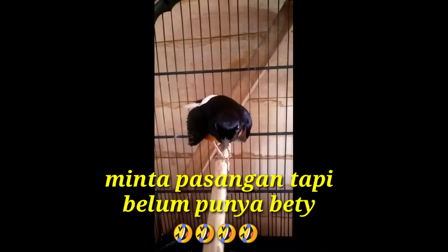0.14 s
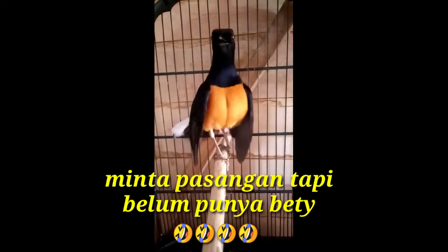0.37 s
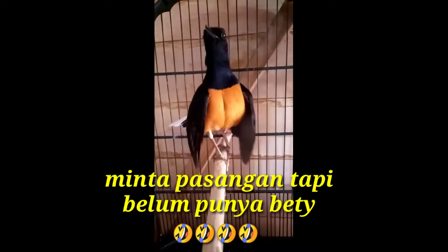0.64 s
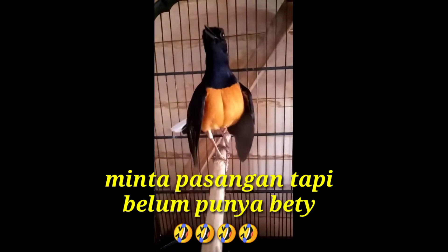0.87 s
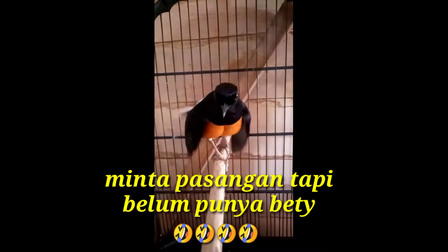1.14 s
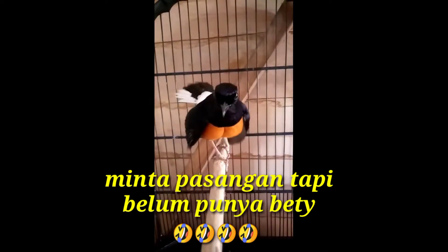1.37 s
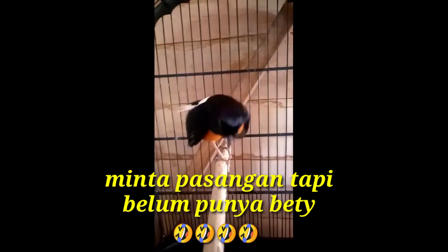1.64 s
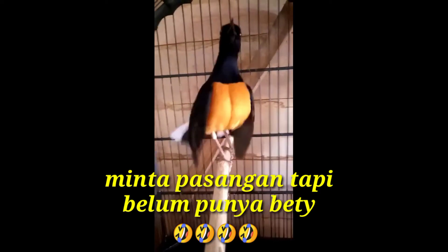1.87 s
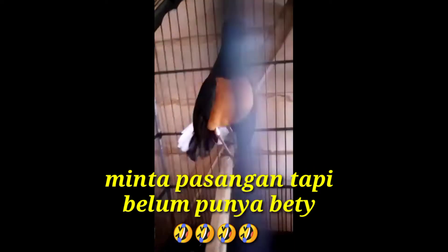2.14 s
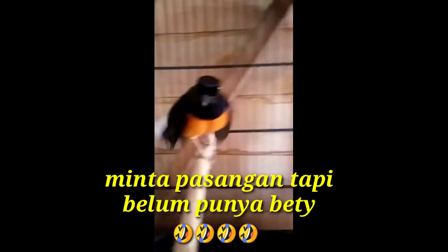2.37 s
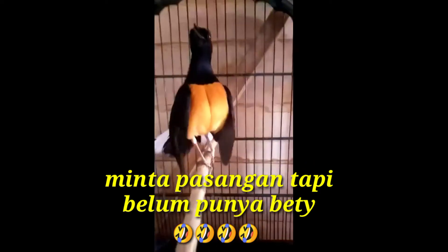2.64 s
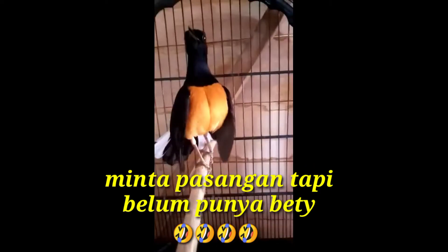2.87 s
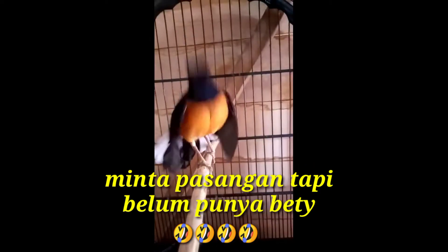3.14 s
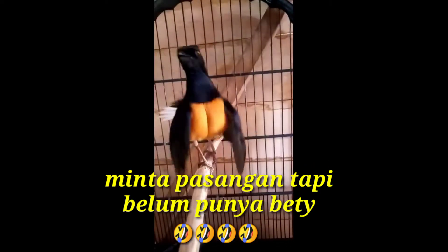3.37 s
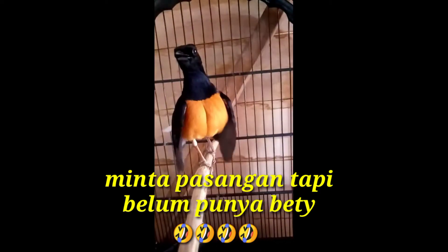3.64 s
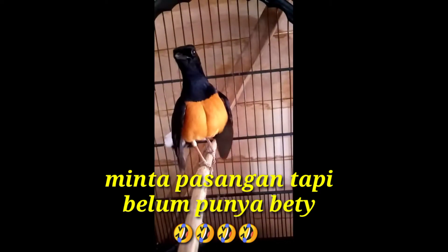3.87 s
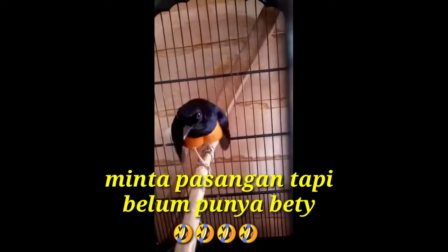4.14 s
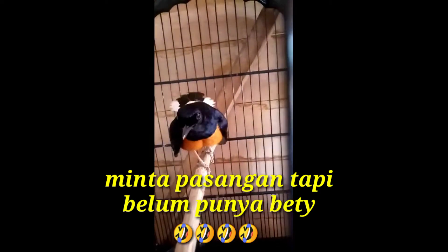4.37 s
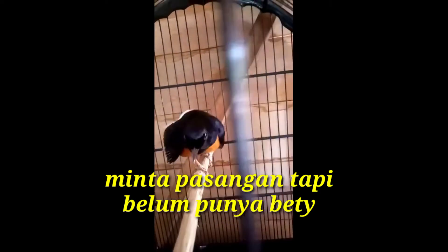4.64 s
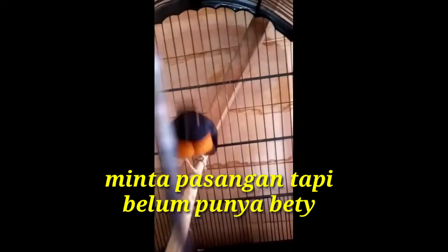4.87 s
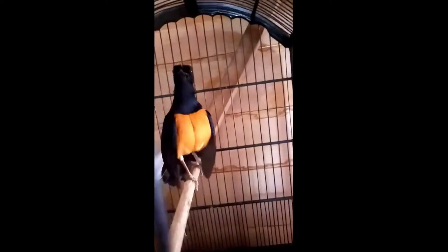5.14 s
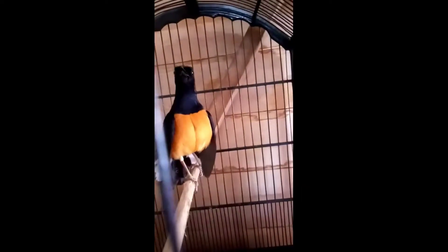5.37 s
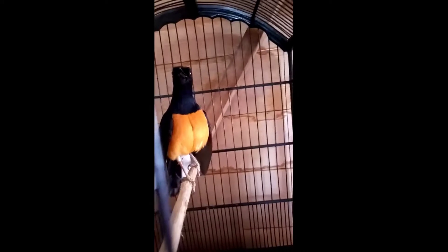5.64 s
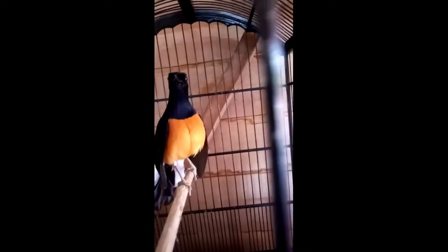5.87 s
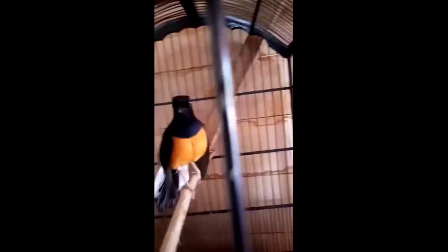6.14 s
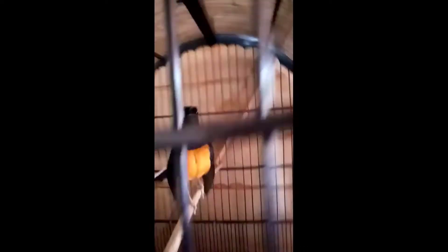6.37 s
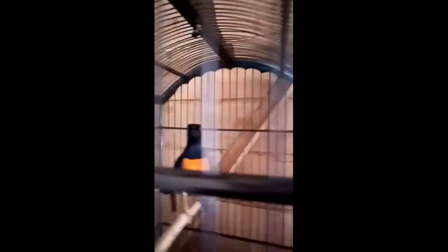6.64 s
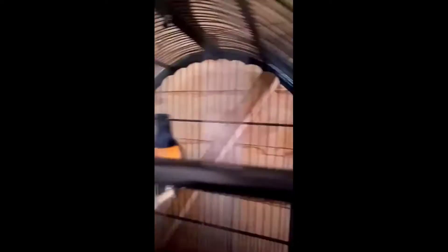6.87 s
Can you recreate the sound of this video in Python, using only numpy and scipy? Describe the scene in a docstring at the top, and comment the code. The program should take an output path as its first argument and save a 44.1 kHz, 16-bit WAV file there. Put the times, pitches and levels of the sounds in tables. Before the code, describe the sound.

One songbird sings loudly and close in a small, hard-walled room. Rapid sliding whistles and buzzy notes come first, then a run of sharp chips with a short nasal squawk among them. A quieter gap holds only faint low chucks, then dense, high, twisting whistles return. Feathers rustle softly, the cage clicks, and low hum and hiss grow towards the end. A phone microphone ducks the background under loud notes.

```python
"""In a small hard room a caged songbird sings close to a phone.
Its gliding whistles, buzzy trills and short chips are sine waves with overtones; one squawk is a nasal stack.
Clicks and puffs of shaped noise come from the cage, and the walls answer with short noise echoes.
Wavering hums and patchy noise make a low hum and a wide hiss that grow stronger towards the end.
The phone's gain control ducks everything whenever the bird is loud."""
import sys
import numpy as np
from scipy import signal
from scipy.fft import rfft, irfft, next_fast_len
from scipy.io import wavfile
from scipy.ndimage import uniform_filter1d, minimum_filter1d, map_coordinates

SR = 44100
rng = np.random.default_rng(int(sys.argv[2]) if len(sys.argv) > 2 else 0)


def wav_record(signal):
    """Record a signal, one row per channel, as 16-bit PCM in the file named by sys.argv[1]."""
    frames = np.transpose(np.atleast_2d(signal))
    bounded = np.clip(frames, -1, 1)
    # unit amplitude maps onto the largest positive 16-bit level
    quanta = np.round(bounded * 32767).astype(np.int16)
    wavfile.write(sys.argv[1], SR, quanta)


def attenuation_scalar(level_db):
    """Turn a level in dB into a linear amplitude multiplier (20 dB per decade)."""
    decades = np.asarray(level_db, float) / 20
    return 10 ** decades


N = 309141
T = np.arange(N) / SR

# Notes sung once: second harmonic over the first at opening [level/dB] and at closing [level/dB],
# then a curve of [t/s, f/Hz, level/dB before the swell bends it]
SINGLE_NOTES = [ (-31, -22, [(0.02, 1250, -30.5), (0.045, 1497, -13.5), (0.068, 1490, -12.5),
                (0.1, 1327, -22), (0.157, 797, -29)]), (-38.5, -27, [(0.21, 1460, -59),
                (0.226, 1508, -11.5), (0.245, 1628, -2.5), (0.256, 1730, -22), (0.264, 1790, -2),
                (0.295, 2176, 5.5), (0.35, 2430, -5), (0.41, 2560, -13.5), (0.435, 2825, -17.5)]),
                (-66, -33.5, [(0.778, 1914, -33), (0.804, 2320, 1.5), (0.84, 1730, -8.5)]),
                (-28, -34.5, [(0.835, 1410, -18), (0.862, 1308, -8), (0.885, 1591, -6), (0.95, 1778, -6),
                (1.0, 2158, -9.5), (1.035, 2446, -24.5)]), (-18.5, -15, [(1.022, 3120, -62),
                (1.061, 3587, 3.5), (1.085, 3464, 5), (1.1, 3210, -43)]), (-23, -22, [(1.197, 1613, -24),
                (1.218, 1228, -16), (1.238, 925, -39)]), (-22, -34, [(1.63, 860, -32), (1.655, 1367, -9),
                (1.68, 2070, 0), (1.725, 2750, -26)]), (-31.5, -9.5, [(1.74, 896, -66), (1.777, 2032, -3),
                (1.799, 2550, -24), (1.837, 2787, -4), (1.858, 3840, -5.5)]),
                (14, -7, [(1.962, 2900, -28.5), (1.972, 2413, -30), (1.99, 2494, -29), (2.03, 2665, -12.5),
                (2.082, 2812, -1), (2.092, 3556, 3), (2.108, 3510, -24)]), (3.5, -8, [(2.176, 3920, -19),
                (2.183, 2646, -11.5), (2.22, 2610, -12.5), (2.29, 2825, -6.5), (2.338, 2936, -5.5),
                (2.355, 3610, -0.5), (2.365, 4290, -1.5), (2.372, 4000, -20)]),
                (-28, -14, [(2.97, 2770, -31), (2.977, 2700, -9.5), (2.988, 2653, -12),
                (3.004, 3010, -3.5)]), (-4.5, 29.5, [(4.99, 2060, -51), (5.004, 1915, -19),
                (5.019, 1781, -11.5), (5.059, 1727, -30.5), (5.088, 1682, -44)]),
                (-12, -32, [(5.076, 1490, -29), (5.097, 2190, -15), (5.113, 2220, -10.5),
                (5.122, 1670, -16)]), (-16, -41, [(5.12, 2590, -17), (5.13, 3043, -12), (5.14, 2484, -7.5),
                (5.15, 2438, 4), (5.163, 2220, -21), (5.169, 2083, 10.5), (5.188, 1902, 4),
                (5.198, 1601, 5), (5.234, 1396, 0.5), (5.25, 1294, -34)]), (-21, -26, [(5.255, 1415, -27),
                (5.275, 1474, -7), (5.285, 1450, -39)]), (-31, -14, [(5.28, 2250, -27), (5.297, 2857, 0),
                (5.313, 3190, -23), (5.345, 3390, -9.5)]), (-46, 15, [(5.345, 3260, -26),
                (5.352, 3965, -24.5), (5.367, 3000, -15), (5.391, 4500, -31.5), (5.41, 3800, -13.5)]),
                (-42.5, -26.5, [(5.407, 2950, -2), (5.418, 3000, -5), (5.44, 3150, -28)]),
                (12, -27, [(5.748, 1790, -23), (5.763, 1340, -11.5), (5.79, 1755, -8.5)]),
                (-22, -36, [(5.783, 2460, -30), (5.799, 2066, 6), (5.837, 1427, 1.5), (5.85, 1435, 1)]),
                (6, 23.5, [(6.094, 1546, -14), (6.106, 1003, -28), (6.115, 769, -27), (6.128, 630, -34.5)]),
                (-17, 13.5, [(6.292, 2500, -32), (6.306, 1960, -19.5), (6.355, 1788, -16.5),
                (6.41, 1768, -34), (6.45, 1746, -42)]), (-24, -30, [(6.455, 3230, -23.5),
                (6.476, 2460, -4.5), (6.498, 2350, 1), (6.525, 2085, -17), (6.528, 1916, 9),
                (6.54, 1654, 3.5), (6.565, 1520, -1)]), (-22, -14.5, [(6.592, 1563, 3), (6.604, 1920, -12),
                (6.612, 2883, -4), (6.62, 3140, -11.5), (6.635, 3400, -8)]), ]
# Syllables that return: second harmonic at opening over closing [level/dB],
# then a curve of [share of the length, pitch over the named pitch, level/dB over the named level]
SYLLABLE_SHAPES = dict( fall=(-10, [(0, .88, -16), (.14, 0.89, -8), (.34, 0.98, 3), (.54, .76, -14),
                   (1, 0.59, -25)]), scoop=(22, [(0, .42, -33.5), (.2, .5, -29), (.36, 0.76, -4.5),
                   (.46, 0.79, -19), (.53, .95, 3), (.82, 1, 1), (1, 0.855, -24)]),
                   chuck=(-15.5, [(0, 2.1, -7), (.28, 1.32, 0.5), (.62, 1, 0), (1, 0.892, -6)]),
                   dip=(-13, [(0, 1.18, -47), (.37, 1, 2.5), (.62, 1.03, 2.5), (1, 1.4, -33)]),
                   swing=(-2.2, [(0, 1.23, -16.5), (.18, 1.07, -3), (.42, 1, -15.5), (.82, 1.17, -0.5),
                   (1, 1.21, -22)]), leap=(-11, [(0, 0.33, -31), (.17, 0.73, -17.5), (.27, .88, 3.5),
                   (.36, 0.93, -15.5), (.6, 1, -1), (1, .92, -35.5)]), peep=(8.2, [(0, 1.03, -12.5),
                   (.64, 1, 5), (1, 1.02, -29.5)]), rising_peep=(41.3, [(0, .92, -20), (.25, 0.96, 1),
                   (1, 1, 1.5)]))
# Where each syllable is sung: [t/s, length/s, named f/Hz, named level/dB,
# closing second harmonic over the first level/dB]
SYLLABLE_TIMES = dict( fall=[(.488, 0.118, 1591, -7.5, -20.5), (.652, .115, 1616, -8.5, -24)],
                  scoop=[(1.222, 0.078, 2010, -2.5, -45), (1.338, 0.08, 2023, -3.5, -45.5),
                  (1.44, .075, 2142, 2, -42.5), (1.54, 0.079, 2214, 5.5, -45)],
                  chuck=[(4.052, 0.029, 634, -31, 8), (4.257, 0.033, 726, -25, 6),
                  (4.432, 0.032, 702, -25, 0.5), (4.575, 0.038, 702, -23.5, -1.5),
                  (4.708, 0.03, 696, -21.5, -1), (4.847, 0.04, 697.5, -22.5, 8.5)],
                  dip=[(5.492, .056, 2810, -2, -15), (5.755, 0.026, 2690, -7, -18)],
                  swing=[(6.7, .072, 2657, -2, -23.5), (6.822, .063, 2700, -8.5, -22)],
                  leap=[(5.589, .055, 3317, 0.5, -19), (5.687, .05, 3230, -2.5, -13.5),
                  (6.937, 0.056, 3054, -6.5, -14)], peep=[(3.878, 0.013, 1490, -37.5, -38),
                  (6.422, 0.025, 2610, -23.5, -43), (5.398, 0.05, 4940, -19.5, -15.5),
                  (5.515, 0.041, 4940, -13, -18.5), (5.62, 0.036, 4924, -15, -12),
                  (5.722, 0.033, 4980, -14, -16), (6.718, 0.049, 4794, -20, -19),
                  (6.835, 0.064, 4690, -30.5, -7), (6.975, 0.025, 4880, -25, -12)],
                  rising_peep=[(2.99, 0.013, 3343, -7, -58), (5.283, 0.0632, 5210, -19.5, -16),
                  (6.605, 0.05, 5180, -16.5, -20.5)])
# Buzzy stretches, where the syrinx flutters: [from t/s, to t/s, mean rate f/Hz, pitch swing 0-1, level swing 0-1]
BUZZES = [(0.292, 0.447, 100, 0.03, 0.44), (0.857, 1.042, 85.86, 0.08, 0.5), (1.693, 1.739, 100, 0.08, 0.4),
          (1.765, 1.854, 90.7, 0.05, 0.26), (1.972, 2.115, 130, 0.05, 0.51),
          (2.172, 2.387, 146.2, 0.02, 0.44), (5.086, 5.24, 75.1, 0.02, 0.25),
          (6.427, 6.57, 80.04, 0.03, 0.5)]
# Whistles that double their period: [from t/s, to t/s, half-pitch line level/dB]
DOUBLED_WHISTLES = [(5.127, 5.144, -6), (5.147, 5.165, -16), (6.463, 6.478, -6)]
# Faint overtones before colouring: [multiple of the pitch, level/dB over the first, level/dB over the second]
FAINT_OVERTONES = [(3, -45.5, -23.5), (4, -47, -31.5), (5, -40.5, -36.5), (6, -45.5, -36)]
# Colour of the faint overtones: [f/Hz, level/dB]
BEAK_COLOUR = [(4000, 0.5), (8000, -1.5), (9400, 9), (11000, -4.5), (14000, 5), (16000, -67)]
# Colour of the air rushing with the tone: [f/Hz, relative level/dB]
AIR_COLOUR = [(2500, -26.5), (5000, -2), (8200, -26.5), (9300, 5.5), (10600, -10.5), (15500, -8)]
# Chips: [t/s, first harmonic level/dB, starting f/Hz, f/Hz the glide heads for, time scale/ms]
CHIP_NOTES = [(2.429, 2, 4240, 5050, 9.3), (2.4935, -2, 3290, 4630, 12), (2.557, 1, 2980, 4010, 5.2),
              (2.615, 0.5, 2780, 3520, 4), (2.674, -12, 2490, 3090, 8.8), (2.7391, -8, 2700, 2940, 6.3),
              (2.747, -12.5, 3530, 3720, 4.1), (2.8069, -3, 2720, 3110, 4.8),
              (2.8795, -1.5, 3150, 3440, 4.6), (3.378, 7.5, 4070, 4650, 3.6), (3.4443, 15, 3884, 4480, 7.5),
              (3.5066, 12.5, 3590, 4280, 5.2), (3.568, 20, 3480, 4025, 6.6), (3.6316, 13, 3550, 3855, 8.6),
              (3.7033, 7.5, 3755, 3676, 6.7), (3.7883, 2, 3985, 4048, 9.4)]
# Second harmonic along the chip series: [t/s, level/dB over the first]
CHIP_SECOND_HARMONIC = [(2.43, -22.5), (2.67, 3.5), (2.74, -4), (2.88, -17.5), (3.79, -26.5)]
# Half-pitch lines along the chip series: [t/s, level/dB over the first]
CHIP_HALF_PITCH = [(2.43, -36), (2.74, -15), (2.88, -43), (3.378, -10), (3.79, -58.5)]
# Course of the squawk: [t/s, f/Hz, level/dB]
SQUAWK_CURVE = [(2.771, 562, -36), (2.8, 574, -27), (2.836, 587.6, -29), (2.861, 643, -24.5),
                (2.921, 676, -29.5), (2.948, 636, -27.5), (2.959, 620, -40)]
# Squawk harmonics from the first up, before they waver: [level/dB]
SQUAWK_HARMONICS = [-26.5, -2.5, 0.5, 3, -17.5, 1, -6, -22, -16, -15, -13, -27, -19.5]
# Puffs of feather noise: [t/s, half width/s, level/dB]
FEATHER_PUFFS = [(.42, 0.012, -50), (0.523, 0.014, -29), (0.604, 0.054, -32.5), (0.789, 0.04, -30),
                 (4.991, 0.0035, -37.5), (5.11, .035, -32.5), (5.671, 0.021, -29), (6.431, 0.035, -34),
                 (6.699, 0.16, -31)]
# Colour of the feather noise: [f/Hz, relative level/dB per Hz]
FEATHER_COLOUR = [(300, -31.5), (650, -7.5), (1500, 2.5), (3000, -12), (5500, -18), (9000, -30)]
# Dry clicks in the cage: [t/s, snap level/dB, knock level/dB above the snap]
CAGE_CLICKS = [(2.405, -21, 24), (2.483, -26, 24), (6.417, -25.5, 0)]
# How fast the early echo dies: [f/Hz, time to fall 60 dB t/s]
WALL_DECAY = [(1000, 0.26), (5000, 0.21)]
# Course of the room tone: [t/s, hum level/dB, hiss level/dB]
ROOM_LEVELS = [(0, -45, -44.5), (1.5, -49.5, -47.5), (3.3, -43, -44.5), (3.9, -35, -44), (5.2, -31, -41.5),
               (6.1, -22.5, -35.5), (6.6, -26, -28.5), (7.01, -24.5, -30.5)]
# Deep hum tones, before they waver: [f/Hz, level/dB under the hum course]
HUM_TONES = [(86.3, -1), (172, -19.5), (297, -17)]
# Colour shared by rumble and hiss: [f/Hz, relative level/dB per Hz]
HISS_COLOUR = [(15, -63.5), (25, -12), (86, 1), (358, -7.5), (429, -22.5), (737, -17), (1030, -27),
               (1410, -20), (2480, -20.5), (4730, -18), (12000, -38.5), (15600, -99)]
# Colour of the low wash: [f/Hz, relative level/dB]
MURMUR_COLOUR = [(200, -5), (400, 4), (1600, -9), (3000, -29)]
# Microphone colour: [f/Hz, level/dB]
MICROPHONE = [(5500, 0.5), (7000, -0.5), (8200, -6.5), (10000, -1.5), (12000, -2), (15000, -15.5)]


def along(points, hz):
    """Reads a table of (frequency, value) points on a log frequency axis."""
    f, value = np.transpose(points)
    return np.interp(np.log(hz + 1), np.log(f + 1), value)


def unit(x):
    """Scales a sound to rms 1."""
    return x / np.sqrt(np.mean(x ** 2) + 1e-20)


def wobble(rate):
    """A smooth random curve with `rate` random points a second."""
    return map_coordinates(rng.standard_normal(int(N * rate / SR) + 4), [T * rate])


def filtered(x, response):
    """Multiplies the spectrum of x by a function of frequency."""
    m = next_fast_len(N + 8192)
    return irfft(rfft(x, m) * response(np.fft.rfftfreq(m, 1 / SR)), m)[:N]


def patchy_noise(patchy_db, response):
    """Coloured noise of rms 1, with patches in time and frequency of random gain."""
    z = signal.stft(rng.standard_normal(N), nperseg=512)[2]
    patches = uniform_filter1d(rng.standard_normal(z.shape), size=5, axis=0)
    patches = uniform_filter1d(patches, size=10, axis=1)
    noise = signal.istft(z * attenuation_scalar(patchy_db * unit(patches)), nperseg=512)[1][:N]
    return unit(filtered(noise, response))


def add(track, s, sound):
    """Lays a sound into the track at s seconds."""
    part = track[round(s * SR):][:len(sound)]
    part += sound[:len(part)]


def notes():
    """Lists every note as opening and closing second harmonic, then times, pitches and levels."""
    out = [(opening_db, closing_db, *np.transpose(curve)) for opening_db, closing_db, curve in SINGLE_NOTES]
    for name, rows in SYLLABLE_TIMES.items():
        turn_db, shape = SYLLABLE_SHAPES[name]
        share, ratio, over_db = np.transpose(shape)
        for s, length, hz, db, end_db in rows:
            out.append((end_db + turn_db, end_db, s + length * share, hz * ratio, db + over_db))
    return out


def flutter():
    """The fluttering syrinx flips between two pitches and swings in level; gives pitch, gain and presence."""
    pitch, gain, buzz, uneven = np.ones(N), np.ones(N), np.zeros(N), wobble(40)
    for start, end, rate, swing, depth in BUZZES:
        on = np.clip(np.minimum(T - start, end - T) / 0.012, 0, 1)
        phase = 2 * np.pi * rate * T + 1.9 * uneven
        pitch += on * swing * np.tanh(2 * np.sin(phase))
        buzz += on
        gain += on * depth * np.sin(phase + 0.5)  # loud around the top of each pitch swing
    shimmer_db = 1.1 + 12 * np.abs(pitch - 1)  # rougher in the buzz
    return pitch * (1 + 0.01 * wobble(200)), gain * attenuation_scalar(shimmer_db * wobble(180)), buzz


def whistles():
    """The two halves of the syrinx each sing gliding tones; sounding together they also make sum tones."""
    # the second harmonic fades above these pitches, beak shut and open
    shut_hz, open_hz = 1000, 3150
    high_voice_hz = 4500  # notes that open above this belong to the high half
    low, high, effort = np.zeros(N), np.zeros(N), np.zeros(N)
    pitch, gain, buzz = flutter()
    blur = 0.5 * wobble(400) + 0.85 * buzz * wobble(900)  # radians; the buzz smears overtones into bands
    halves = 0
    for start, end, db in DOUBLED_WHISTLES:
        halves = halves + attenuation_scalar(db) * np.clip(np.minimum(T - start, end - T) / 0.0069, 0, 1)
    broken = np.array([wobble(90) for _ in FAINT_OVERTONES])

    for opening_db, closing_db, s, hz, db in notes():
        turn_start = s[1] if len(s) > 3 else s[0]
        turn_end = s[-2] if len(s) > 2 else s[-1]
        second_db = np.interp(s, [turn_start, turn_end], [opening_db, closing_db])
        span = slice(round(s[0] * SR), round(s[-1] * SR))
        t = T[span]
        glide = uniform_filter1d(np.interp(t, s, hz), size=200, mode="nearest")
        phase = 2 * np.pi * np.cumsum(glide * pitch[span]) / SR
        steady = 2 * np.pi * np.cumsum(glide * np.sqrt(pitch[span])) / SR  # half the flutter

        def swell(level_db):
            """Bends the level smoothly from point to point."""
            return np.interp(t, s, attenuation_scalar(level_db) ** 0.5) ** (1 / 0.53)

        is_high = hz[0] > high_voice_hz
        beak_shut = hz.min() < 780  # low chucks are sung with the beak shut
        edge_hz = shut_hz if beak_shut else open_hz if hz[0] < high_voice_hz else SR
        throat = 1 / (1 + (glide / edge_hz) ** 12)
        first = swell(db)
        second = swell(db + second_db) * (0.02 + throat)

        tone = first * np.sin(phase)
        tone += second * attenuation_scalar(2.6 * broken[3, span]) * np.sin(2 * phase + blur[span] / 4)
        tone += halves[span] * first * (np.sin(0.5 * phase) + attenuation_scalar(-6.5) * np.sin(1.5 * phase))
        muffle = 0.55 if beak_shut else 1
        for k, of_first_db, of_second_db in FAINT_OVERTONES:
            k = round(k)
            strength = (attenuation_scalar(of_first_db) * first + attenuation_scalar(of_second_db) * second) * muffle
            breakup = attenuation_scalar(along(BEAK_COLOUR, k * glide) + 3.5 * broken[k - 3, span])  # overtones come and go
            tone += strength * breakup * np.sin(k * steady + blur[span])

        edge = np.clip(np.minimum(t - s[0], s[-1] - t) / 0.004, 0, 1)  # 4 ms fades
        add(high if is_high else low, s[0], tone * edge * gain[span])
        if not beak_shut:
            add(effort, s[0], (first + second) * edge * gain[span])

    air = attenuation_scalar(-37.5) * effort * patchy_noise(4, lambda f: attenuation_scalar(along(AIR_COLOUR, f)))
    sum_tones = attenuation_scalar(3.0) * filtered(low * high, lambda f: f > 4000)  # only the sums carry
    return low + high + sum_tones + air


def chips():
    """Very short gliding notes with a bell-shaped swell; half-pitch lines show a doubled period."""
    out = np.zeros(N)
    t = T[:SR // 25]
    for s, db, start_hz, toward_hz, ms in CHIP_NOTES:
        second_db = np.interp(s, *np.transpose(CHIP_SECOND_HARMONIC))
        half_db = np.interp(s, *np.transpose(CHIP_HALF_PITCH))
        u = t / (ms / 1000)
        phase = 2 * np.pi * np.cumsum(start_hz + (toward_hz - start_hz) * np.tanh(1.32 * u)) / SR
        # random phase in radians that smears the overtones
        rough = 0.7 * uniform_filter1d(rng.standard_normal(len(t)), size=25) * np.sqrt(25)
        rise = np.sin(np.pi / 2 * np.clip(u / 0.36, 0, 1)) ** 2
        shape = rise * np.exp(-(0.93 * u) ** 3)
        tone = np.sin(phase)
        for k in range(4):
            tone += attenuation_scalar(second_db - 14.7 * k) * np.sin((2 + k) * phase + (k + 1) / 2 * rough)
        half_lines = np.sin(1.5 * phase + rough)
        half_lines += attenuation_scalar(-6) * np.sin(phase / 2 + rough)
        half_lines += attenuation_scalar(-14) * np.sin(2.5 * phase + rough)
        tone += attenuation_scalar(half_db) * half_lines
        add(out, s - 0.0015, attenuation_scalar(db) * shape * tone)
    return out


def squawk():
    """A nasal stack of harmonics with almost no fundamental; it grows out of a rasp and ends in one."""
    s, hz, db = np.transpose(SQUAWK_CURVE)
    phase = 2 * np.pi * np.cumsum(np.interp(T, s, hz) * (1 + 0.006 * wobble(200))) / SR
    # the rasp scatters each harmonic's phase, radians
    opening_rasp = 0.55 * np.exp(-np.maximum(T - 2.79, 0) / 0.012)
    closing_rasp = 0.9 * np.exp(-((T - 2.952) / 0.008) ** 2)
    rasp = opening_rasp + 0.28 + closing_rasp
    stack = np.zeros(N)
    for k, level_db in enumerate(SQUAWK_HARMONICS, 1):
        stack += attenuation_scalar(level_db + 4.8 * wobble(60)) * np.sin(k * phase + k * k + rasp * wobble(700))
    return attenuation_scalar(np.interp(T, s, db, -120, -120)) * filtered(stack, lambda f: f > 800)


def rustles():
    """Soft grainy puffs of noise, probably feathers as the bird bows and spreads its wings."""
    swell = sum(attenuation_scalar(db) * np.exp(-((T - s) / width) ** 2) for s, width, db in FEATHER_PUFFS)
    grain = attenuation_scalar(3.5 * wobble(150))
    return swell * grain * patchy_noise(3.9, lambda f: attenuation_scalar(along(FEATHER_COLOUR, f)))


def ticks():
    """Clicks in the cage: a wide noise snap over a much shorter low knock, both dying exponentially."""
    out, t = np.zeros(N), T[:SR // 20]
    for s, db, knock_db in CAGE_CLICKS:
        snap = rng.standard_normal(len(t)) * attenuation_scalar(-60 * t / 0.07)
        knock = attenuation_scalar(knock_db) * np.sin(2 * np.pi * 1100 * t) * attenuation_scalar(-60 * t / 0.0016)
        add(out, s, attenuation_scalar(db) * (snap + knock))
    return out


def walls(x):
    """The room's echo is dying noise: each frequency fades at its own speed, with a slower, duller late part."""
    late_db, late_t60_s = -23, 0.71
    hz, t, z = signal.stft(rng.standard_normal(SR // 2), SR, nperseg=256)
    late = attenuation_scalar(late_db - 60 * t / late_t60_s) / (1 + (hz[:, None] / 5000) ** 4)
    early = attenuation_scalar(-60 * t / along(WALL_DECAY, hz)[:, None])
    tail = signal.istft(z * np.hypot(early, late), SR, nperseg=256)[1]
    delayed = np.pad(x, (180, 0))  # samples, about 4 ms
    echo = signal.fftconvolve(delayed, tail / np.linalg.norm(tail))[:N]
    return map_coordinates(echo, [(T + 4e-5 * wobble(70)) * SR])  # the echo wavers in pitch


def lingering_note():
    """The dying echo of a note sung just before: a narrow band of noise that fades from the start."""
    level_db, centre_hz, t60_s = -27, 2235, 0.38
    band = patchy_noise(2.6, lambda f: np.abs(f - centre_hz) < 320)
    return attenuation_scalar(level_db - 60 * T / t60_s) * band


def room_tone():
    """Two slightly unsteady machine hums over an uneven rumble, a low wash and a smoother hiss."""
    s, *levels_db = np.transpose(ROOM_LEVELS)
    deep_db, hiss_db = (np.interp(T, s, db) for db in levels_db)
    deep, hiss_gain = attenuation_scalar(deep_db), attenuation_scalar(hiss_db)
    upper = attenuation_scalar(-42 - 0.27 * (deep_db - deep_db[0]))  # yields as the deep hum gains
    rumble_gain = attenuation_scalar(-41.5 + 0.41 * (hiss_db - hiss_db[0]))  # follows the hiss

    hum = np.zeros(N)
    for hz, db in HUM_TONES:
        hum += attenuation_scalar(db + 2.8 * wobble(4)) * np.sin(2 * np.pi * hz * T + 0.45 * wobble(7))
    drone = attenuation_scalar(2.9 * wobble(14)) * np.sin(2 * np.pi * 130 * T + 2.25 * wobble(8.9))

    def low(f):
        """Share of the noise that belongs to the rumble."""
        return 1 / (1 + (f / 420) ** 6)

    def hiss_response(f):
        """The rest of the noise, rolled off in the treble."""
        return attenuation_scalar(along(HISS_COLOUR, f)) * (1 - low(f)) / (1 + (f / 7600) ** 12)

    rumble = rumble_gain * patchy_noise(4.76, lambda f: attenuation_scalar(along(HISS_COLOUR, f)) * low(f))
    hiss = hiss_gain * patchy_noise(1.8, hiss_response)
    murmur = attenuation_scalar(-13) * patchy_noise(4.0, lambda f: attenuation_scalar(along(MURMUR_COLOUR, f)))  # grows with the hum
    return deep * (hum + murmur) + upper * drone + rumble + hiss


def scene():
    """Adds up the bird, feathers and cage, their echoes and the room tone."""
    cage = whistles() + chips() + squawk() + ticks() + rustles()
    echoes = attenuation_scalar(-9.5) * walls(cage) + lingering_note()
    return (cage + echoes + room_tone())[None]


def gain_control(x, ceiling_db, ahead_s, release_s):
    """Turns loud peaks down towards the ceiling, a little early, and lets go 20 dB in the release time."""
    over_db = np.maximum(20 * np.log10(np.abs(x) + 1e-9) - ceiling_db, 0)
    width = int(ahead_s * SR)
    held_db = -minimum_filter1d(-over_db, size=2 * width + 1)
    fall = T * 20 / release_s
    cut_db = np.maximum.accumulate(held_db + fall) - fall
    return x * attenuation_scalar(-uniform_filter1d(cut_db, size=width))


def roll_off(x):
    """The treble ends steeply here."""
    return signal.sosfilt(signal.butter(12, 16000, fs=SR, output="sos"), x)


def record(dry):
    """The phone colours the sound with its microphone and controls the gain."""
    heard = filtered(dry[0], lambda f: attenuation_scalar(along(MICROPHONE, f)))
    mix = gain_control(heard, ceiling_db=-6.0, ahead_s=0.0096, release_s=0.17)[None]
    return roll_off(mix)


dry = scene()
out = record(dry)
wav_record(out)
```